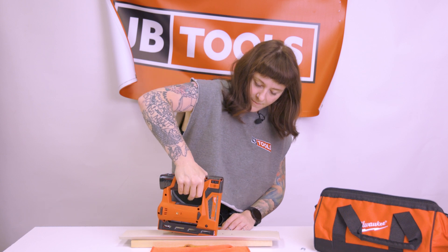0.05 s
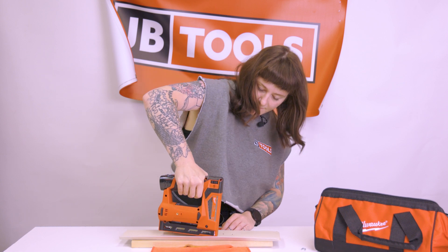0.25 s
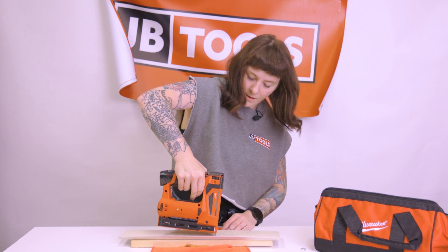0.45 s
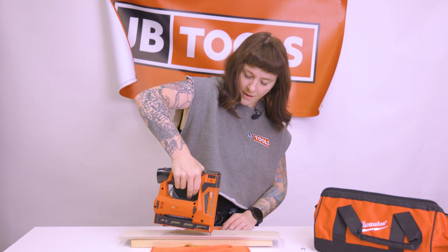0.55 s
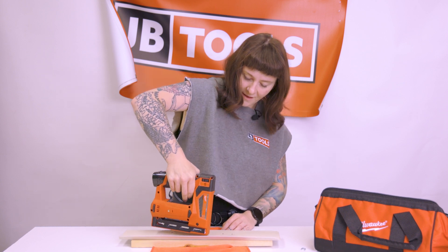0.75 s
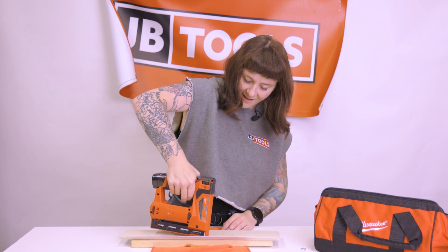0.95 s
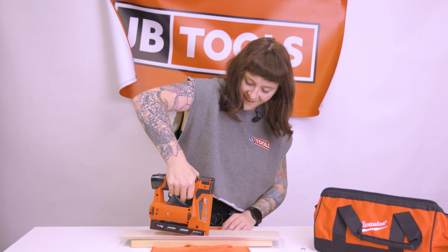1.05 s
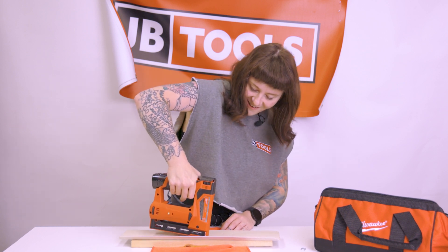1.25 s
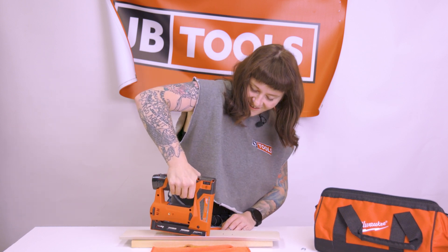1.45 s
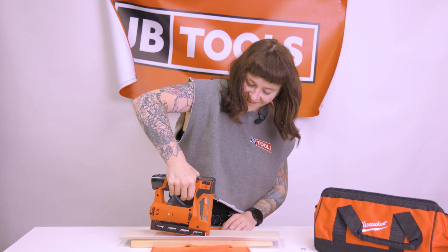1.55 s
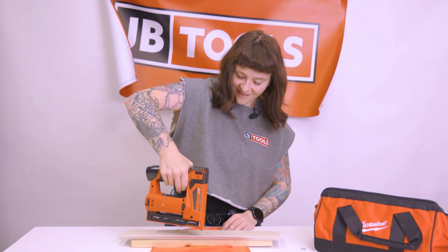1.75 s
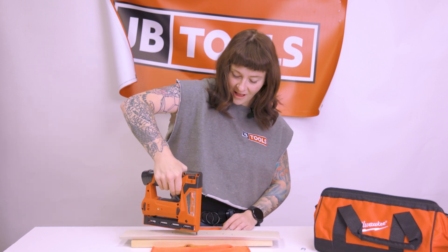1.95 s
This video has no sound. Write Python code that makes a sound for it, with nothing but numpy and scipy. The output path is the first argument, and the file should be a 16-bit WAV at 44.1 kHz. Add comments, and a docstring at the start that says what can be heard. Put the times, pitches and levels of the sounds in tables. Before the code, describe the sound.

In a small quiet room, a nearby cordless stapler fires twice into wood. Each time a motor winds up, a latch snaps and a sharp bang lands with a thump. Light knocks and clicks come in between.

```python
"""A small motor whirrs up and a cordless stapler bangs a staple into a wooden board, twice, in a quiet room.
Each cycle the gears take up the spring, the driver is let go and slams the staple home, and the motor runs
on briefly. Housing, steel and board ring, and the recoil thumps the table underneath.
Between the shots come dull knocks and ticks as the tool is lifted, set down and its trigger pressed."""
import sys
import numpy as np
from scipy import signal
from scipy.fft import rfft, irfft
from scipy.io import wavfile
from scipy.ndimage import uniform_filter1d

SR = 44100
rng = np.random.default_rng(int(sys.argv[2]) if len(sys.argv) > 2 else 0)


def to_wav(sig):
    """Store sig (one row per channel, or 1-D mono) as 16-bit WAV at the path in sys.argv[1].

    Samples outside -1..1 are clipped; the rate is SR.
    """
    pcm = np.clip(np.atleast_2d(sig), -1, 1) * 32767
    pcm = np.round(pcm).astype(np.int16)
    wavfile.write(sys.argv[1], SR, pcm.T)  # frames by channels


N = 88200

# the two shots: strike_s, level_db, bite_db (louder, brighter blows), run_on_s, latch_db, spin_up_db
SHOTS = [(0.2125, 0, 0.5, 0.26, -3.5, 0), (1.3884, 1, -0.5, 0.26, 1, 2)]
CATCH_S, BUMPER_S, BUMPER_RISE_S = -0.142, 0.0062, 0.00053  # catch and bumper are timed from the strike


def amp(db):
    """Decibels to gain."""
    return 10 ** (np.asarray(db) / 20)


def unit(x):
    """Scales to rms 1."""
    return x / np.sqrt(np.mean(x ** 2) + 1e-20)


def read(points, hz):
    """Reads a curve on a log-frequency axis."""
    f, value = np.transpose(points)
    return np.interp(np.log(hz + 1), np.log(f + 1), value)


def add(mix, s, sound):
    """Mixes a sound in at s seconds."""
    at = round(s * SR)
    sound = sound[max(-at, 0):]
    part = mix[max(at, 0):][:len(sound)]
    part += sound[:len(part)]


def grit(size=4096):
    """Fresh white noise."""
    return rng.standard_normal(size)


def colour(x, spectrum, tilt_db=0, size=4096):
    """Minimum-phase EQ; above 1 kHz it tilts by tilt_db per octave, pivoting at 4 kHz."""
    hz = abs(np.fft.fftfreq(size, 1 / SR))
    log_gain = np.log(amp(read(spectrum, hz) + tilt_db * np.log2(np.maximum(hz, 1000) / 4000)))
    taps = np.fft.ifft(np.exp(np.conj(signal.hilbert(log_gain)))).real
    return signal.fftconvolve(x, taps[:size // 2])


def chatter(noise, rise, t60):
    """A brief rattle of contacts with energy 1, evened out so that it covers all pitches."""
    t = np.arange(len(noise)) / SR
    shape = (1 - np.exp(-(t + 1 / SR) / max(rise, 1 / SR))) * amp(-60 * t / t60)
    x = noise * shape
    for _ in range(4):  # flatten the spectrum, then restore the envelope
        z = rfft(x)
        x = irfft(z / (abs(z) + 1e-12), len(t))
        x *= shape / np.sqrt(abs(uniform_filter1d(x ** 2, size=90)) + 1e-12)
    return x / np.linalg.norm(x)


def ringing(modes, rise=0):
    """Dying modes of a struck part, neighbours swinging in opposite directions."""
    t = np.arange(SR // 2) / SR
    attack = 1 - np.exp(-t / max(rise, 1 / SR))
    return attack * sum((-1) ** k * amp(db - 60 * t / t60) * np.sin(2 * np.pi * hz * t)
                        for k, (hz, db, t60) in enumerate(modes))


def air():
    """A faint, steady bed of room tone."""
    # room tone spectrum: freq_hz, level_db
    spectrum = [(15, -32), (25, -6.5), (44, -14), (92, -6), (195, -8), (416, -16), (775, -3.5), (863, -13),
                (1290, -14), (3520, -35), (3920, -33), (11600, -39.5), (16000, -60)]
    tone = irfft(rfft(grit(N)) * amp(read(spectrum, np.fft.rfftfreq(N, 1 / SR))), N)
    return amp(-67.5) * unit(tone)


def gear_rasp(tooth_phase):
    """Meshing teeth make a fluttering noise that rings the gearbox."""
    # motor and gear noise: freq_hz, level_db
    spectrum = [(50, -21), (170, -4.5), (350, -5), (800, 0.5), (1500, -2), (2600, -3.5), (4200, -9.5),
                (5600, -10), (7400, -17), (8700, -17.5), (10300, -20), (12900, -18), (16000, -32.5)]
    # gearbox resonances: centre_hz, width_hz, level_db
    resonances = [(1230, 120, -13), (2280, 1100, -8.5), (3570, 110, -19), (8680, 240, -23),
                  (12600, 900, -27.5)]
    depth, n = 0.45, len(tooth_phase)
    flutter = (1 + depth * np.cos(tooth_phase)) * (1 + depth * np.cos(tooth_phase / 7))
    rasp = colour(grit(n) * flutter, spectrum)
    rasp = rasp[:n] / np.std(rasp)
    ring = sum(amp(db) * unit(signal.lfilter(*signal.iirpeak(hz, hz / width, SR), rasp))
               for hz, width, db in resonances)
    return unit(rasp + ring)


def motor():
    """The gears rasp and whine; they slow and grow louder against the spring, then run free and brake."""
    # effort while winding the spring: time_from_strike_s, level_db
    wind_up = [(-.222, -23.5), (-.2, -7.5), (-.15, -8), (-.135, -1.5), (-.11, 1), (-.06, -1), (-.025, -3.5),
               (0, -8)]
    tooth_hz, spin_up_s, load_sag, wobble_depth = 2378, 0.02, 0.13, 0.02
    motor_db, whine_db, run_on_db, coast_db_per_s, brake_db_per_s = -46, -12.5, -6.5, 12, 498
    dull_hz, brighten_s = 3000, 0.035
    out, t = np.zeros(N), np.arange(wind_up[0][0], 0.45, 1 / SR)
    age = t - t[0]
    for s, _, _, run_on_s, _, spin_up_db in SHOTS:
        effort_db = np.interp(t, *np.transpose(wind_up)) + spin_up_db * (t < CATCH_S)
        free_db = run_on_db - coast_db_per_s * t - brake_db_per_s * np.maximum(t - run_on_s, 0)
        speed = (1 - np.exp(-age / spin_up_s)) * (1 - load_sag * amp(effort_db) * (t < 0))
        wobble = wobble_depth * unit(uniform_filter1d(grit(len(t)), size=200))
        tooth_phase = 2 * np.pi * np.cumsum(tooth_hz * speed * (1 + wobble)) / SR
        rasp = gear_rasp(tooth_phase)
        dull = signal.sosfilt(signal.butter(2, dull_hz, fs=SR, output="sos"), rasp)
        bright = 1 - np.exp(-age / brighten_s)  # the rasp opens up as the motor gains speed
        whirr = (1 - bright) * dull + bright * rasp + amp(whine_db) * np.sin(tooth_phase)
        surge_db = 1.3 * unit(uniform_filter1d(grit(len(t)), size=260))  # uneven as the gears turn
        add(out, s + t[0], whirr * amp(surge_db + motor_db + np.where(t < 0, effort_db, free_db)))
    return out


def bumps():
    """Dull knocks as the tool is lifted off the board and set down."""
    # tool against board: start_s, level_db, t60_s, hardness_db_per_octave
    hits = [(.001, -6.5, 0.056, -3), (.014, -9, 0.032, 1.5), (0.683, -10, 0.064, -16),
            (0.8997, -5.5, 0.0136, 2.5), (0.9047, 2.5, 0.024, 2.5)]
    # wooden knock: freq_hz, level_db
    knock = [(30, -11), (75, 0), (150, 4.5), (270, -4.5), (380, -17.5), (600, -16.5), (2000, -27.5),
             (5000, -52.5), (16000, -66.5)]
    out = np.zeros(N)
    for s, db, t60, hardness in hits:
        spectrum = [(hz, level + hardness * np.log2(max(hz / 200, 1))) for hz, level in knock]
        add(out, s, amp(db) * colour(chatter(grit(), 0, t60), spectrum))
    return out


def catch_and_latch():
    """Before each shot the gears catch the spring and a latch snaps. Returns contacts and rings."""
    # clunk of the catch: freq_hz, level_db
    clunk = [(50, -18), (160, -1), (330, -13.5), (850, -2), (2200, -12.5), (5000, -23.5), (16000, -48)]
    # snap of the latch: freq_hz, level_db
    snap = [(200, -22), (2000, -13), (2800, -8.5), (3400, -17.5), (4300, -4.5), (9000, -22), (12200, -13.5),
            (16000, -29)]
    # ring of the latch: pitch_hz, level_db, t60_s
    ping = [(2790, -27, 0.021), (4120, -37, .018), (5140, -43, .015), (6340, -37.5, 0.019),
            (11860, -39.5, 0.026)]
    contacts, rings = np.zeros(N), np.zeros(N)
    for s, _, _, _, latch_db, _ in SHOTS:
        gain = amp(latch_db / 2)
        add(contacts, s + CATCH_S, gain * colour(chatter(grit(), rise=0.0022, t60=0.021), clunk))
        add(contacts, s - 0.1268, gain * colour(chatter(grit(), rise=0.00045, t60=0.017), snap))
        add(rings, s - 0.1262, amp(latch_db) * ringing(ping, rise=0.0008))
    return contacts, rings


def blow(spectrum, delay, rise, t60):
    """One noisy layer of the bang, mostly alike from shot to shot; times are in seconds."""
    out, shared, alike = np.zeros(N), grit(), 0.8
    for s, db, bite_db, *_ in SHOTS:
        burst = chatter(alike * shared + np.sqrt(1 - alike ** 2) * grit(), rise, t60)
        add(out, s + delay, amp(db + bite_db) * colour(burst, spectrum, tilt_db=bite_db / 2))
    return out


def driver_bangs():
    """The driver rushes down, strikes the staple, sinks it and hits its bumper; the tool recoils."""
    # rush of the driver: freq_hz, level_db
    rush = [(100, -8), (500, 13), (1500, 8), (4000, 1.5), (8000, 2), (10000, -3), (13000, 1), (16000, -4)]
    # crack of driver on staple: freq_hz, level_db
    crack = [(100, -9), (900, 5.5), (2300, 18), (4000, 6.5), (7500, 14), (9000, 0.5), (13000, 4),
             (16000, -7)]
    # crunch of staple into wood: freq_hz, level_db
    crunch = [(100, -5), (400, 12), (950, 27), (1300, 15.5), (1800, 14), (3000, 15), (5500, 11),
              (9500, 3.5), (16000, 0.5)]
    # thud on the bumper: freq_hz, level_db
    thud = [(60, 4.5), (230, 23.5), (430, 18.5), (650, 22), (1500, 8), (5500, 6.5), (10000, 0.5),
            (12400, 10), (14000, -0.5), (16000, -5.5)]
    # recoil pushing board and table: freq_hz, level_db
    thump = [(25, -3), (45, 10), (70, 26), (110, 25.5), (135, 16), (190, 30), (270, 31), (420, 23),
             (800, 17.5), (2000, -5), (8000, -25.5)]
    out = blow(rush, delay=-0.0052, rise=0.0014, t60=0.035)
    out += blow(crack, delay=0, rise=0.00012, t60=0.011)
    out += blow(crunch, delay=0.002, rise=0.0006, t60=0.022)
    out += blow(thud, BUMPER_S, BUMPER_RISE_S, t60=0.017)
    for s, db, *_ in SHOTS:
        add(out, s + 0.005938, -amp(db) * colour(np.ones(1), thump))
    return out


def staple_squeak():
    """The staple squeaks into the wood, its pitch dropping as it goes deeper."""
    from_hz, to_hz, glide_s, length_s = 2400, 213, 0.0026, 0.014
    t = np.arange(0, length_s, 1 / SR)
    hz = to_hz + (from_hz - to_hz) * np.exp(-t / glide_s)
    envelope = np.sin(np.pi * np.sqrt(t / length_s))
    return amp(-12.5) * envelope * np.sin(2 * np.pi * np.cumsum(hz) / SR)


def shot_tones():
    """The pitched side of each shot: the staple squeaks while steel, housing, board and room ring."""
    # steel driver and magazine: pitch_hz, level_db, t60_s
    steel = [(3190, -27.5, .06), (4500, -26.5, 0.066), (5780, -25.5, 0.058), (5460, -25.5, 0.03),
             (7400, -21.5, .02)]
    # housing, board and room resonances: pitch_hz, level_db, t60_s
    board_and_room = [(189, -35, 0.3), (257.3, -20, 0.24), (361, -23.5, 0.22), (444, -32.5, .22), (540.7, -26, 0.24),
                      (600.7, -31.5, .24), (667, -26.5, 0.26), (732, -22.5, 0.2), (807, -25.5, 0.17),
                      (940, -22, 0.18), (990, -27, 0.26), (1061, -32.5, .26), (1208, -27.5, 0.11), (1602, -28, 0.099),
                      (1843, -20.5, 0.1), (2098, -23, 0.063), (2464, -24.5, .05), (2805, -17.5, 0.055)]
    # the driver's ring on hitting the bumper: pitch_hz, level_db, t60_s
    zing = [(11980, -23.5, .035), (12700, -22.5, 0.033), (12800, -28.5, .025)]
    out = np.zeros(N)
    for s, db, *_ in SHOTS:
        add(out, s, amp(db) * staple_squeak())
        add(out, s, amp(db) * ringing(steel))
        add(out, s + 0.003, amp(db) * ringing(board_and_room))
        add(out, s + BUMPER_S, amp(db) * ringing(zing, BUMPER_RISE_S))
    return out


def pawls_and_trigger():
    """Small parts tick, each tick with a main note of its own. Returns contacts and rings."""
    # ticks: start_s, level_db, tilt_db_per_octave, t60_s, ring_hz, ring_relative_db
    ticks = [(0.3918, -22, -0.5, 0.017, 4400, -24.5), (0.4916, -27, -5, .008, 1499, -18),
             (0.68, -35.5, -2, 0.05, 4400, -19), (0.7108, -49, -2, 0.04, 6500, -17),
             (0.9049, -42, -7, 0.013, 2697, -9), (1.0828, -42.5, -4.5, 0.011, 1180, -3),
             (1.1287, -30.5, 1, 0.0078, 6960, -16), (1.1742, -44, 3.5, 0.0079, 12700, -15),
             (1.5587, -25, 2.5, 0.012, 6600, -19.5), (1.6924, -24.5, -5.5, 0.015, 3500, -14)]
    # contact noise of a tick: freq_hz, level_db
    click = [(100, -27.5), (800, -17), (1500, -0.5), (2700, 4), (3500, 2), (5000, -4), (7200, -2.5),
             (9200, -11), (13000, -7), (16000, -14.5)]
    # ring common to all ticks: pitch_hz, level_db, t60_s
    tick_modes = [(1506, -14.5, 0.011), (2250, -22, 0.01), (2810, -25, .009), (3350, -23.5, 0.0067),
                  (5465, -25, 0.01), (7970, -27, 0.0087), (10200, -31.5, 0.0088)]
    contacts, rings = np.zeros(N), np.zeros(N)
    for s, db, tilt_db, t60, ring_hz, ring_db in ticks:
        add(contacts, s, amp(db - 1) * colour(chatter(grit(), 0, t60), click, tilt_db))
        modes = [(hz, level + tilt_db * np.log2(hz / 4000), decay) for hz, level, decay in tick_modes]
        add(rings, s, amp(db) * ringing(modes + [(ring_hz, ring_db, 0.009)]))
    return contacts, rings


def room(x):
    """A small room: a few near echoes, then a short, even tail whose treble dies first."""
    # tail decay: freq_hz, t60_s
    decay = [(60, .3), (280, .33), (600, 0.35), (950, .33), (2500, 0.31), (6000, 0.18), (12000, 0.21),
             (16000, .19)]
    # tail colour: freq_hz, level_db
    spectrum = [(60, -8.5), (125, -4.5), (180, -7.5), (290, -2.5), (430, -3.5), (580, -4), (800, -5.5),
                (2500, -4), (6000, -9), (12500, -9.5), (16000, -9.5)]
    # early reflections: delay_s, gain
    echoes = [(.0046, 0.13), (0.012, 0.11), (0.0157, .12), (.0215, 0.072)]
    hz, t, bands = signal.stft(grit(SR), SR, nperseg=256)
    bands = bands * amp(-60 * t / read(decay, hz)[:, None])
    tail = signal.istft(bands, SR, nperseg=256)[1][:SR]
    t, hz = np.arange(SR) / SR, np.fft.rfftfreq(SR, 1 / SR)
    swell = np.minimum(t / 0.011, 1) ** 2 * (t < 0.5)  # builds over 11 ms
    z = rfft(tail * swell)
    power = uniform_filter1d(uniform_filter1d(abs(z) ** 2, size=60), size=60)
    tail = irfft(z / np.sqrt(power) * amp(read(spectrum, hz)), SR) * swell
    for s, gain in echoes:
        add(tail, s, np.array([gain]))
    return signal.fftconvolve(x, tail)[:N]


def scene():
    """Stapler and room tone in mono; the noisy layers feed the reverb, the rings stay dry."""
    whirr, knocks = motor(), bumps()
    snaps, latch_rings = catch_and_latch()
    bangs = driver_bangs()
    ticks, tick_rings = pawls_and_trigger()
    mechanism = whirr + snaps + ticks
    rings = latch_rings + shot_tones() + tick_rings
    wet = room(amp(-2) * bangs + amp(-2.5) * mechanism + amp(-4.5) * knocks)
    return (air() + mechanism + knocks + bangs + rings + wet)[None]


def record(dry):
    """The bangs overload the input softly; then a low cut and a band limit."""
    ceiling, low_cut_hz, top_hz = 2, 71, 15900
    held = ceiling * np.tanh(dry / ceiling)
    held = signal.sosfilt(signal.butter(3, low_cut_hz, "high", fs=SR, output="sos"), held)
    return signal.oaconvolve(held, signal.firwin(401, top_hz, window=("kaiser", 8), fs=SR)[None], "same")


dry = scene()
out = record(dry)
to_wav(out)
```